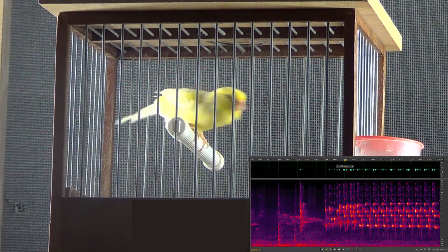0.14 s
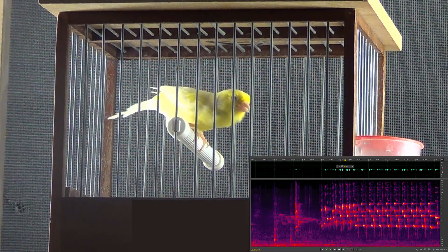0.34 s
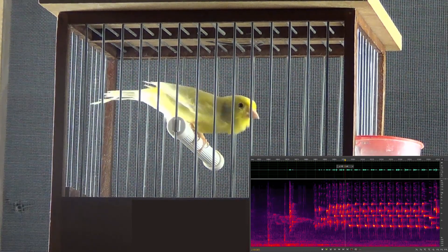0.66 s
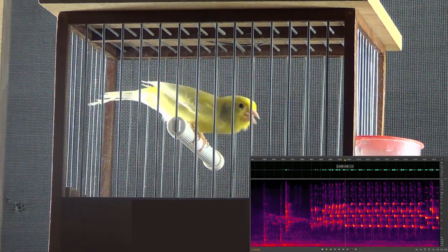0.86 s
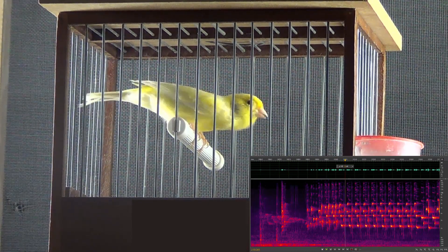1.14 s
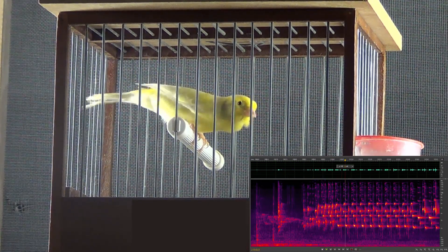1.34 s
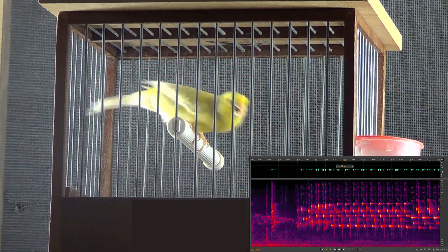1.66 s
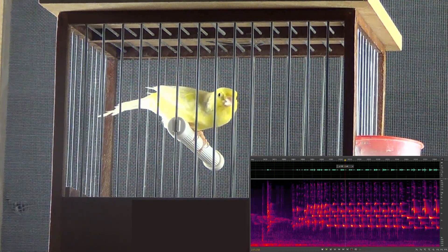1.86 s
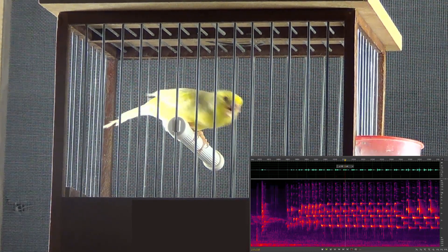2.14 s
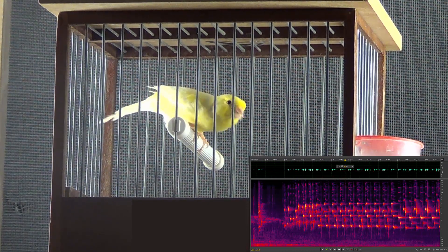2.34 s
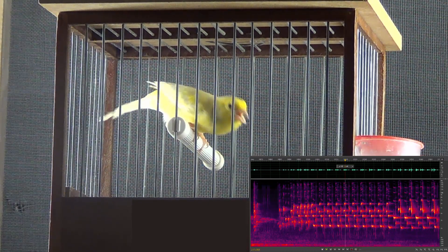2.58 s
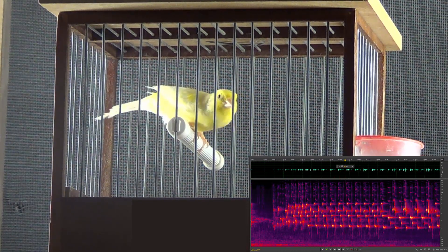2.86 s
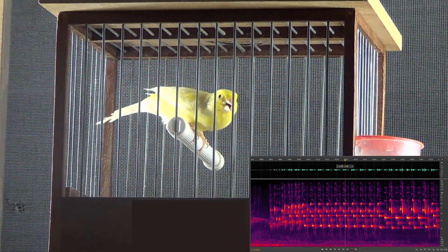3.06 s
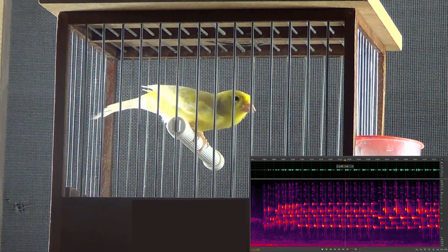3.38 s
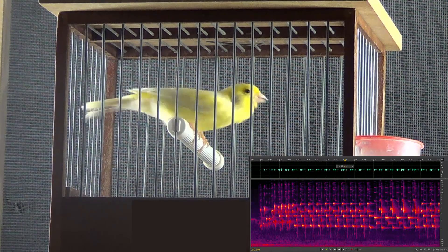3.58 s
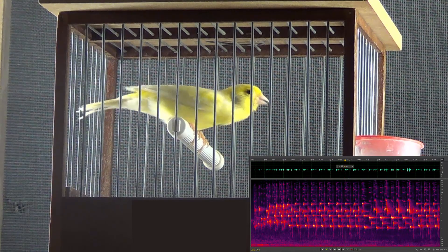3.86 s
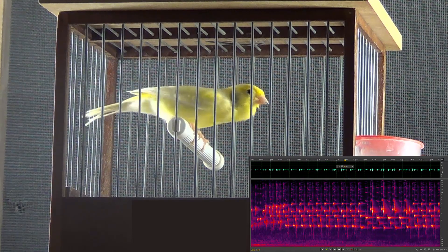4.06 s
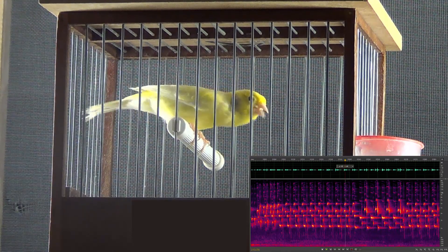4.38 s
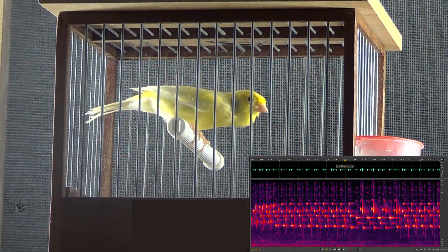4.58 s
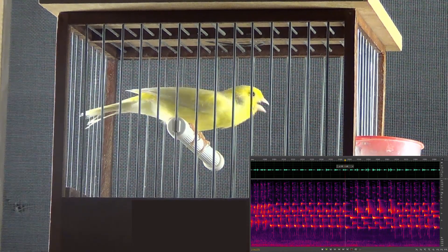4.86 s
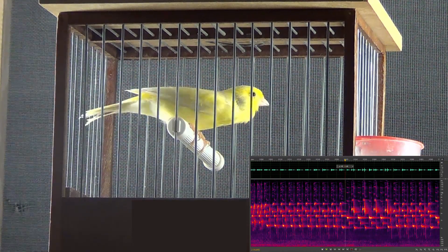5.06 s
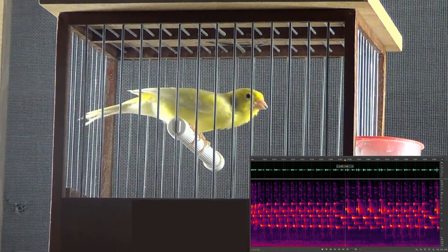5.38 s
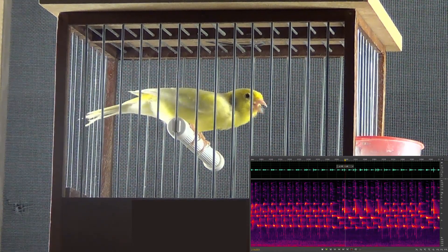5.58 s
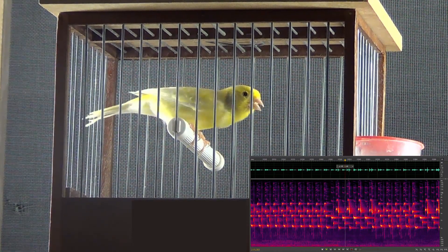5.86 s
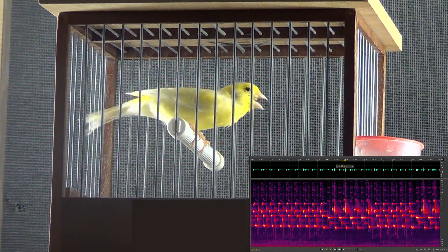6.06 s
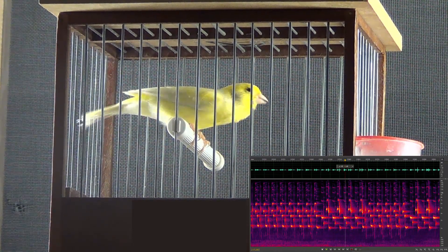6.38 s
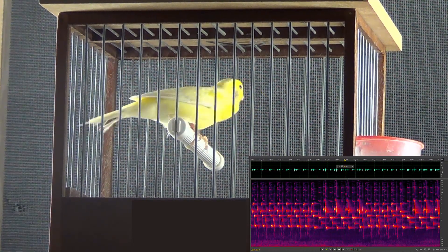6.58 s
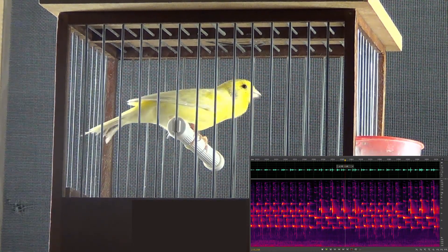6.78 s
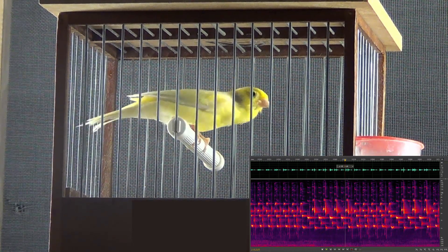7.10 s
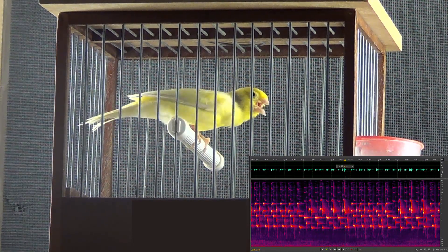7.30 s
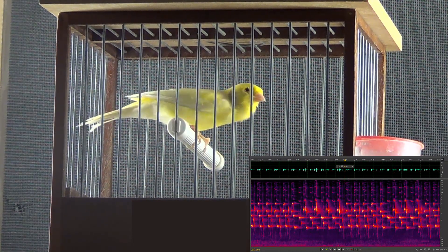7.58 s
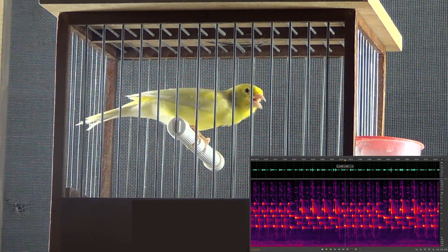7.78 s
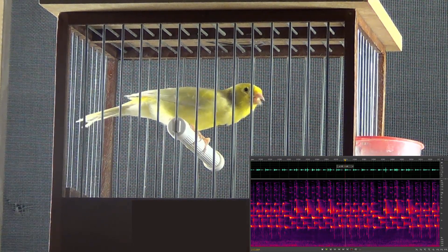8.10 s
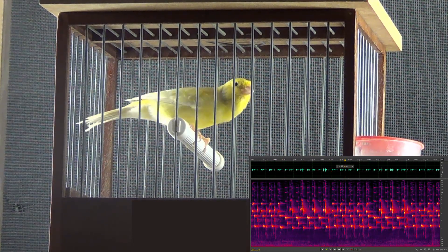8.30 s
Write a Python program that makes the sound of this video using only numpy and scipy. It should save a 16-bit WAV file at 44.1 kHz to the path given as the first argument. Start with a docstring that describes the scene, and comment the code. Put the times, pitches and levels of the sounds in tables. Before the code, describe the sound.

A caged canary sings close by indoors, two buzzy opening chirps, then fast repeated whistle-and-chatter notes, slower fluted swooping phrases, and whistles again.

```python
"""A caged canary sings indoors, near a pair of microphones: two buzzy opening phrases, then a run of
whistle-and-chatter phrases, broken by four slower ones with a fluted note and a steep swoop.
Each note is a gliding tone with weak overtones and a rush of air, roughened by random flutter of its pitch.
Cage echoes and a decaying room tail follow it; filtered noise makes a low wash and a thin hiss,
a faint low hum drifts in pitch, and two brief swells of narrow low noise are heard."""
import sys
import numpy as np
from scipy import signal
from scipy.fft import rfft, irfft
from scipy.io import wavfile
from scipy.ndimage import uniform_filter1d

SR = 44100
rng = np.random.default_rng(int(sys.argv[2]) if len(sys.argv) > 2 else 0)


def transcribe(signal):
    """Save signal, clipped to [-1, 1], as a 16-bit WAV file at the path in sys.argv[1]."""
    frames = np.atleast_2d(signal).T
    limited = np.clip(frames, -1, 1)
    pcm = np.round(limited * 32767).astype(np.int16)
    wavfile.write(sys.argv[1], SR, pcm)


N = 372204
EDGE_HZ = 16100  # upper limit of the overtones and of the recorder's band

# The song has six kinds of syllable, each a fixed run of notes. Effort is added to the notes' own levels.
# Tweets, the main syllable. Each row: lead start in seconds, pip start in seconds, effort in dB,
# whistle pitch in Hz, pip level in dB, coo pitch in Hz.
TWEETS = [(.845, 0.94, -4.5, 5635, -23.5, 2280), (1.269, 1.362, -2.5, 5834, -24.5, 2270),
          (1.704, 1.798, -0.5, 5810, -23, 2263), (2.141, 2.232, -0.5, 5817, -24.5, 2246),
          (2.583, 2.673, 0.5, 5890, -22.5, 2238), (3.024, 3.123, 0, 5936, -21.5, 2218),
          (3.479, 3.578, 1, 5870, -20.5, 2195), (3.94, 4.04, 3.5, 5880, -21.5, 2220),
          (4.397, 4.493, 2, 5830, -23.5, 2208), (4.84, 4.939, 1, 5886, -19.5, 2074),
          (7.718, 7.819, 2.5, 5915, -22, 2236), (8.164, 8.259, 2, 5816, -22, 2219)]
# Chatters between the tweets. Each row: time of the tick in seconds, effort in dB.
CHATTERS = [(1.113, 0), (1.534, 0.5), (1.972, -1), (2.414, -0.5), (2.855, 0.5), (3.303, -1), (3.762, -1),
            (4.221, 0.5), (4.673, 0.5), (7.555, 0), (8.003, 1), (8.44, 2)]
# Flutes, which open the slow phrases. Each row: start in seconds, closing yip in seconds, level in dB,
# left minus right in dB.
FLUTES = [(5.224, 5.34, -22.5, 7.5), (5.813, 5.938, -20, 3.5), (6.407, 6.53, -19, 4.5),
          (7.008, 7.135, -22.5, 5)]
# Swoops, which close them. Each row: lead start in seconds, plunge in seconds, effort in dB, lead pitch in Hz,
# lead left minus right in dB, high note level in dB, coo pitch in Hz, coo level in dB.
SWOOPS = [(5.472, 5.585, -1.5, 4690, -4, -36, 2016, -32.5), (6.053, 6.166, 1, 4710, 7, -35, 2028, -33),
          (6.653, 6.77, -1, 4667, 19, -29.5, 2044, -32.5), (7.255, 7.375, -0.5, 4530, 7, -32, 2106, -28.5)]
# Opening chirps. Each row: lead start in seconds, pip start in seconds, effort in dB, pitch of the rise in Hz.
CHIRPS = [(0.097, 0.18, -3, 5115), (0.469, .557, 0.5, 5265)]
# Opening buzzes. Each row: time in seconds, pitch in Hz, effort in dB.
BUZZES = [(-.09, 5270, -1.5), (.288, 5350, 2), (.667, 5400, 2)]

# Gestures of the syrinx, one for each kind of note.
# Each row: seconds from the note's time, Hz above its pitch, relative effort in dB.
LEAD_GESTURE = [(-.005, -300, -38), (0, -170, -13), (.005, -70, -4), (.012, 10, 0), (.017, 60, -6),
                (.025, 90, -27)]
WHISTLE_GESTURE = [(-.01, -420, -27), (0, -170, -3), (.014, -31, 5.5), (0.029, 9.5, 2.5),
                   (0.052, 10.5, -.5), (.072, 29, -16), (.08, -200, -35)]
PIP_GESTURE = [(-.004, -80, -36), (0, 20, -13), (.005, 22, -4), (.011, 5, 0), (.016, -10, -3),
               (.023, -35, -11), (.032, -80, -28)]
COO_GESTURE = [(-.016, 427, -26), (-.004, 113.5, -15.5), (.006, 42, -3), (0.027, 10.5, 1.5),
               (0.051, -2.5, -3), (.072, -29, -7), (0.095, -36.5, -23.5)]
CHUCK_GESTURE = [(-.028, -900, -29), (-.021, -1250, -21), (-.013, -1600, -18), (-.008, -1750, -45),
                 (-.002, 150, -40), (.001, 80, 0), (.005, -20, -2), (.015, -60, -9), (.026, 0, -22)]
TICK_GESTURE = [(-.002, 896, -31.5), (.0005, 405, -8.5), (.0025, -54, 2), (.005, -300, -16),
                (0.009, -500, -14.5)]
DROP_GESTURE = [(-.003, 539, -18.5), (.002, 162.5, 5.5), (.008, -44, 6.5), (.013, -350, -30.5),
                (0.016, -850, -11.5), (.024, -1150, -14.5), (0.032, -1300, -40)]
FLUTE_GESTURE = [(-.02, 280, -36), (0, 95, -16), (.016, 35, 0), (.036, 2, -.5), (.068, -8, -1.5),
                 (.087, -28, -7), (.104, -25, -11), (.118, 30, -30)]
CATCH_GESTURE = [(-.008, -500, -10), (.001, 3, 7.5), (.007, 690.5, -6), (.012, 1399.5, -6), (.02, 1490, -9)]
YIP_GESTURE = [(-.002, -120, -32.5), (.001, -34, 0.5), (.006, 7, -1.5), (0.012, 20, -10),
               (0.025, -20.5, -19)]
HIGH_GESTURE = [(-.018, -130, -19), (0, -85, -2), (0.021, -8.5, -1.5), (0.039, 21.5, 6.5),
                (0.061, -14.5, 2.5), (.074, -62, -30), (0.079, -150, -41)]
PLUNGE_GESTURE = [(-.01, 2494, -21), (-.005, 1815, -20), (-.001, 891, -12), (.003, 341, -5), (.008, 20, -5),
                  (0.015, -180, -4.5), (0.021, -350, -15)]
LOW_COO_GESTURE = [(-.024, 258.5, -29), (-.004, 96, -11.5), (0.015, 43, 0.5), (0.031, 5, 2.5),
                   (.055, -9, -5), (.078, -18.5, -11), (0.099, -24, -28)]
RISE_GESTURE = [(-.008, -650, -27), (.002, -380, -7), (.014, -70, 0), (.03, 20, -2), (.045, 70, -8),
                (.062, 40, -25)]
LONG_YIP_GESTURE = [(-.006, 120, -26), (.001, 28, -2), (.01, -2, 0), (.022, -12, -3), (.034, -150, -21)]
RASP_GESTURE = [(-.033, -2150, -33), (-.027, -2300, -26.5), (-.016, -2450, -25.5), (-.011, -1200, -17),
                (-.003, -750, -18), (.002, -100, -0.5), (.01, 119, -19), (0.019, 158, -24)]
BUZZ_GESTURE = [(-.002, -600, -35), (.002, -480, 11), (.009, -150, 8.5), (0.015, 58, 10.5), (.025, 42, 1),
                (.032, -100, -10)]
PURR_GESTURE = [(-.006, -250, -15), (.004, 20, 0), (.016, 0, -1), (.027, -650, -5), (.042, -120, -3),
                (.062, 0, -4), (.074, -50, -20)]

# Overtones as the open beak radiates them. Each row: frequency in Hz, relative level in dB.
OVERTONES = [(3000, -1), (4500, 4.5), (6700, -4), (8000, 0), (10000, -7.5), (12000, -2.5), (14000, -3.5),
             (16000, -12.5)]
# Air rushing through the syrinx. Each row: frequency in Hz, relative density in dB per Hz.
RUSH = [(800, -35), (2500, 6.5), (5000, 8.5), (7500, -6), (10000, 3), (13500, 3), (16000, -4.5)]
# The bird turns its head for a few tweets. Each row: time in seconds, turn from 0 in profile to 1 facing
# the microphones.
HEAD_TURN = [(1.3, 0.35), (1.8, 1), (2.15, 1), (3.15, 1), (3.45, 0.096), (8.44, 0)]
# Delay of the bird at the right microphone, varied with pitch by the nearby walls, head in profile.
# Each row: pitch in Hz, lag behind the left in seconds.
PROFILE_LAG = [(2200, -.00018), (2600, .000079), (3000, .00005), (3300, .00011), (3550, .00002),
               (4400, -.00004), (6000, -.00001)]
# The same with the head turned. Each row: pitch in Hz, lag behind the left in seconds.
TURNED_LAG = [(2200, -.00008), (3550, -.0001), (4400, 0.0044), (6000, -0.0049)]
# Reverberation of the room. Each row: frequency in Hz, time to decay by 60 dB in seconds.
ROOM_DECAY = [(1000, .55), (2200, .66), (3500, .64), (5000, .58), (7000, .43), (10000, .28), (15000, .2)]

# Colour of the low wash. Each row: frequency in Hz, relative density in dB per Hz.
WASH_COLOUR = [(10, -6), (25, 1), (42, -12.5), (65, -12.5), (90, -16), (140, -12), (300, -18), (580, -21),
               (800, -26.5), (1300, -25.5), (2200, -47), (4000, -53)]
# Course of the low wash. Each row: time in seconds, relative level in dB.
WASH_LEVEL = [(0, -58), (1.57, -61.5), (2.4, -57.5), (3.9, -61), (5.6, -62), (6.6, -66), (8.44, -65.5)]
# Colour of the thin hiss. Each row: frequency in Hz, relative density in dB per Hz.
HISS_COLOUR = [(300, -22.5), (1000, -25.5), (2000, 7), (5000, -8), (10000, -19.5), (14000, -19.5),
               (16000, -25)]
# Course of the faint hum. Each row: time in seconds, mean pitch in Hz, relative level in dB.
HUM = [(0, 215, -55), (0.899, 201.8, -55), (2.299, 174.4, -61.5), (3.9, 170.2, -61.5), (4.35, 167, -57),
       (4.8, 169.6, -62.5), (5.45, 172.5, -52.5), (5.75, 172.5, -65), (6.399, 166.9, -65.5),
       (6.7, 130.8, -61.5), (8.44, 167.4, -61)]
# Two soft low bumps. Each row: time in seconds, level in dB.
BUMPS = [(3.99, -61.5), (6.48, -66.5)]


def amp(db):
    """Logarithmic level: 20 dB is a tenfold amplitude."""
    return 10 ** (np.asarray(db) / 20)


def evened(x):
    """Normalization of power: scales to rms 1."""
    return x / np.sqrt(np.mean(x ** 2) + 1e-20)


def read(points, hz):
    """Logarithmic frequency scale: interpolates a table's values along it."""
    table_hz, value = np.transpose(points)
    return np.interp(np.log(hz + 1), np.log(table_hz + 1), value)


def pan(db):
    """Level difference between channels: left and right gains of mean power 1, db apart."""
    return evened(amp([[db / 2], [-db / 2]]))


def wander(size, rate_hz):
    """Low-passed random fluctuation: noise of about rms 1, rolled off smoothly around rate_hz."""
    padded = size + SR // 4
    hz = np.fft.rfftfreq(padded, 1 / SR)
    spectrum = rfft(rng.standard_normal(padded)) * np.exp(-(hz / rate_hz) ** 2)
    return evened(irfft(spectrum, padded))[:size]


def add(mix, s, sound):
    """Superposition: adds a stereo sound at time s; one begun before zero leaves only its later part."""
    start = round(s * SR)
    sound = sound[:, max(-start, 0):]
    part = mix[:, max(start, 0):][:, :sound.shape[1]]
    part += sound[:, :part.shape[1]]


def sing(rows, gesture, overtone_db, rush_db, rough, flutter_hz, wet_db):
    """Frequency modulation in the syrinx: a gesture bends each note, and membrane flutter roughens its pitch."""
    out = np.zeros((2, N))
    when, bend_hz, effort_db = np.transpose(gesture)
    t = np.arange(when.min(), when.max(), 1 / SR)
    glide_hz = uniform_filter1d(np.interp(t, when, bend_hz), size=64)
    swell = amp(np.interp(t, when, effort_db)) * signal.windows.tukey(len(t), .06)
    strong = np.flatnonzero(swell > swell.max() * amp(-9))
    rush_colour = amp(read(RUSH, np.fft.rfftfreq(len(t), 1 / SR)))
    for s, pitch_hz, db, side_db, lag_s in rows:
        drift = .003 * wander(len(t), 50)
        flutter = rough * wander(len(t), flutter_hz)
        hz = (pitch_hz + glide_hz) * (1 + drift + flutter)
        phase = 2 * np.pi * np.cumsum(hz) / SR
        overtones = np.zeros(len(t))
        for k in range(2, 8):
            gain = amp(read(OVERTONES, k * abs(hz))) * (k * hz < EDGE_HZ)
            overtones += gain * np.sin(k * phase)
        tone = np.sin(phase) + amp(overtone_db + 4.14 * wander(len(t), 140)) * overtones

        # air rushes through most while the note is starting
        rush = evened(irfft(rfft(rng.standard_normal(len(t))) * rush_colour, len(t)))
        rush *= np.exp(-(t - t[0]) / .056)
        voice = swell * tone + amp(rush_db) * np.sqrt(swell) * rush

        direct, echoes = room(lag_s)  # each note draws its own random echoes
        paths = pan(side_db) * direct + amp(wet_db) * echoes
        heard = signal.fftconvolve(voice[None], paths, axes=1)
        # the level is that of the note's strong part at the microphones, echoes included
        strong_rms = np.sqrt(np.mean(heard[:, strong] ** 2))
        add(out, s + t[0], amp(db) * heard / strong_rms)
    return out


def notes(s, hz, db, side_db, turned_db=0):
    """Level and time differences between channels: rows of s, pitch Hz, level dB, left minus right dB, lag s."""
    turn = np.interp(s, *np.transpose(HEAD_TURN))
    lag_s = (1 - turn) * read(PROFILE_LAG, hz) + turn * read(TURNED_LAG, hz)
    return np.column_stack(np.broadcast_arrays(s, hz, db, side_db + turned_db * turn, lag_s))


def tweets(whistle_after_s=.018, coo_after_s=.024, lead_hz_per_db=20):
    """Pitch steps: up from lead to whistle, down from pip to coo; effort makes the lead louder and higher."""
    lead_s, pip_s, effort, whistle_hz, pip_db, coo_hz = np.transpose(TWEETS)
    lead_hz = 4332.5 + lead_hz_per_db * effort
    leads = notes(lead_s, hz=lead_hz, db=-22.5 + effort, side_db=8, turned_db=-5)
    whistles = notes(lead_s + whistle_after_s, hz=whistle_hz, db=-28.5, side_db=5.5, turned_db=1)
    pips = notes(pip_s, hz=3567.4, db=pip_db, side_db=13.5, turned_db=-21.5)
    coos = notes(pip_s + coo_after_s, hz=coo_hz, db=-29.5, side_db=13.5, turned_db=-5.5)
    return (sing(leads, LEAD_GESTURE, overtone_db=-25, rush_db=-35.5, rough=.0082, flutter_hz=690, wet_db=-5.5)
            + sing(whistles, WHISTLE_GESTURE, overtone_db=-17.5, rush_db=-29, rough=.0063, flutter_hz=300,
                   wet_db=-4.5)
            + sing(pips, PIP_GESTURE, overtone_db=-28, rush_db=-30.5, rough=.0033, flutter_hz=700, wet_db=-4.5)
            + sing(coos, COO_GESTURE, overtone_db=-34.5, rush_db=-42, rough=.0029, flutter_hz=200, wet_db=-6))


def chatters(chuck_before_s=.033, drop_after_s=.022, sag_hz_per_s=20):
    """Rapid glides: a rough chuck, a sharp tick and a falling drop, which starts lower as the song goes on."""
    s, effort = np.transpose(CHATTERS)
    chucks = notes(s - chuck_before_s, hz=2987, db=-37 + effort, side_db=13, turned_db=15)
    ticks = notes(s, hz=4594, db=-24 + effort, side_db=2, turned_db=8)
    drops = notes(s + drop_after_s, hz=2245 - sag_hz_per_s * s, db=-34.5 + effort, side_db=15)
    return (sing(chucks, CHUCK_GESTURE, overtone_db=-28, rush_db=-37, rough=.05, flutter_hz=900, wet_db=-2)
            + sing(ticks, TICK_GESTURE, overtone_db=-20.5, rush_db=-33, rough=.015, flutter_hz=1510, wet_db=-6)
            + sing(drops, DROP_GESTURE, overtone_db=-33, rush_db=-40, rough=.021, flutter_hz=800, wet_db=-6.5))


def flutes(catch_before_s=.025):
    """Nearly steady oscillation: a long pure note breaks off in a catch and ends with a yip."""
    s, yip_s, db, side_db = np.transpose(FLUTES)
    held = notes(s, hz=3285, db=db, side_db=side_db)
    catches = notes(yip_s - catch_before_s, hz=4300, db=-48.5, side_db=7)
    yips = notes(yip_s, hz=2599, db=-30.5, side_db=6.5)
    return (sing(held, FLUTE_GESTURE, overtone_db=-29, rush_db=-39, rough=.0012, flutter_hz=200, wet_db=-5)
            + sing(catches, CATCH_GESTURE, overtone_db=-26.5, rush_db=-12, rough=.088, flutter_hz=900, wet_db=1)
            + sing(yips, YIP_GESTURE, overtone_db=-26, rush_db=-36, rough=.008, flutter_hz=600, wet_db=-3))


def swoops(high_before_s=.075, coo_after_s=.031):
    """Wide downward glide: a lead jumps to a thin high note, which plunges steeply and settles in a low coo."""
    lead_s, plunge_s, effort, lead_hz, lead_side_db, high_db, coo_hz, coo_db = np.transpose(SWOOPS)
    leads = notes(lead_s, hz=lead_hz, db=-19.5 + effort, side_db=lead_side_db)
    highs = notes(plunge_s - high_before_s, hz=6910, db=high_db, side_db=9)
    plunges = notes(plunge_s, hz=4407, db=-19 + effort, side_db=12.5)
    coos = notes(plunge_s + coo_after_s, hz=coo_hz, db=coo_db, side_db=18.5)
    return (sing(leads, LEAD_GESTURE, overtone_db=-25, rush_db=-35, rough=.0052, flutter_hz=690, wet_db=-1)
            + sing(highs, HIGH_GESTURE, overtone_db=-12.5, rush_db=-27, rough=.0035, flutter_hz=298, wet_db=-7)
            + sing(plunges, PLUNGE_GESTURE, overtone_db=-27, rush_db=-25.5, rough=.021, flutter_hz=1150,
                   wet_db=-5.5)
            + sing(coos, LOW_COO_GESTURE, overtone_db=-35.5, rush_db=-39, rough=.002, flutter_hz=200,
                   wet_db=-5.5))


def chirps(rise_after_s=.013, yip_after_s=.019):
    """Successive tones: a lead note hands over to a rough rise; then a pip hands over to a yip."""
    lead_s, pip_s, effort, rise_hz = np.transpose(CHIRPS)
    leads = notes(lead_s, hz=4170, db=-29 + effort, side_db=9)
    rises = notes(lead_s + rise_after_s, hz=rise_hz, db=-26.5 + effort, side_db=10)
    pips = notes(pip_s, hz=3545, db=-21.5, side_db=-30)
    yips = notes(pip_s + yip_after_s, hz=2690, db=-34 + effort, side_db=15)
    return (sing(leads, LEAD_GESTURE, overtone_db=-22, rush_db=-31, rough=.017, flutter_hz=690, wet_db=-3)
            + sing(rises, RISE_GESTURE, overtone_db=-16, rush_db=-30, rough=.0082, flutter_hz=400, wet_db=-4)
            + sing(pips, PIP_GESTURE, overtone_db=-26.5, rush_db=-28.5, rough=.0021, flutter_hz=700, wet_db=-5.5)
            + sing(yips, LONG_YIP_GESTURE, overtone_db=-26, rush_db=-34, rough=.012, flutter_hz=600, wet_db=-4.5))


def buzzes(rasp_before_s=.024, purr_after_s=.026):
    """Strong random frequency modulation: a rasp climbs into a loud buzz, which drops to a low purr."""
    s, hz, effort = np.transpose(BUZZES)
    rasps = notes(s - rasp_before_s, hz=4250, db=-30, side_db=8)
    peaks = notes(s, hz=hz, db=-25.5 + effort, side_db=7)
    purrs = notes(s + purr_after_s, hz=2860, db=-38.5, side_db=7)
    return (sing(rasps, RASP_GESTURE, overtone_db=-23, rush_db=-38, rough=.035, flutter_hz=800, wet_db=-2.5)
            + sing(peaks, BUZZ_GESTURE, overtone_db=-17.5, rush_db=-23, rough=.029, flutter_hz=490, wet_db=-7.5)
            + sing(purrs, PURR_GESTURE, overtone_db=-25.5, rush_db=-41, rough=.042, flutter_hz=600, wet_db=-3))


def room(lag_s, tail_db=-5, cage_db=-3, cage_s=.015):
    """Impulse response from beak to microphones: direct path, quick echoes in the cage, and the room's tail."""
    t = np.arange(SR * 3 // 4) / SR
    # fractional delays by a sinc pulse; a lag outside the 2 ms window leaves almost no direct sound on the right
    delay_s = np.array([[0], [lag_s]])
    direct = np.sinc((t - delay_s) * SR - 16) * (t < .002)
    # sparse echoes of random sign: one set for the tail, one for the cage
    taps = rng.choice([-1., 1.], (2, 2, len(t))) * (rng.random((2, 2, len(t))) < 1 / 10)
    taps *= t > .001
    hz, age_s, bands = signal.stft(taps[0], SR, nperseg=256)
    decay = amp(-60 * age_s / read(ROOM_DECAY, hz)[:, None])
    tail = signal.istft(bands * decay, SR, nperseg=256)[1][:, :len(t)]
    cage = taps[1] * np.exp(-t / cage_s)
    echoes = amp(tail_db) * evened(tail) + amp(cage_db) * evened(cage)
    return direct, pan(5.5) * echoes / np.sqrt(len(t))


def bumps(hz=500, width_hz=60, length_s=.03):
    """Amplitude-modulated narrow-band noise: each bump is a brief swell of it."""
    t = np.arange(N) / SR
    swell = sum(amp(db) * np.exp(-((t - s) / length_s) ** 2) for s, db in BUMPS)
    narrow_noise = evened(wander(N, width_hz) * np.sin(2 * np.pi * hz * t))
    return pan(11) * swell * narrow_noise


def hum(trim_db=-7, waver_db=3):
    """Harmonic series: three partials share a drifting pitch while each wavers in level."""
    s, hz, db = np.transpose(HUM)
    t = np.arange(N) / SR
    pitch_hz = np.interp(t, s, hz) * (1 + .03 * wander(N, 25))
    phase = 2 * np.pi * np.cumsum(pitch_hz) / SR
    partials = np.zeros(N)
    for k, gain in enumerate([1, .23, .29], 1):
        partials += gain * amp(waver_db * wander(N, 4.9)) * np.sin(k * phase)
    return pan(8) * evened(partials) * amp(np.interp(t, s, db) + trim_db)


def noise(spectrum):
    """Partial coherence: coloured noise, partly shared by the two microphones."""
    white = rng.standard_normal((2, N)) + .34 * rng.standard_normal(N)
    colour = amp(read(spectrum, np.fft.rfftfreq(N, 1 / SR)))
    return evened(irfft(rfft(white) * colour, N))


def low_wash(trim_db=2.5):
    """Filtered noise: a quiet low wash whose level slowly varies."""
    t = np.arange(N) / SR
    level_db = np.interp(t, *np.transpose(WASH_LEVEL)) + trim_db
    return pan(9.5) * amp(level_db) * noise(WASH_COLOUR)


def hiss(level_db=-72):
    """Stationary filtered noise: a thin hiss."""
    return pan(9.5) * amp(level_db) * noise(HISS_COLOUR)


def scene():
    """Superposition: the bird over the quiet of the room."""
    bird = tweets() + chatters() + flutes() + swoops() + chirps() + buzzes()
    return bird + bumps() + hum() + low_wash() + hiss()


def record(dry):
    """Low-pass filtering: the recorder's band limit."""
    band_limit = signal.firwin(511, EDGE_HZ, window=("kaiser", 9), fs=SR)
    return signal.oaconvolve(dry, band_limit[None], "same")


dry = scene()
out = record(dry)
transcribe(out)
```